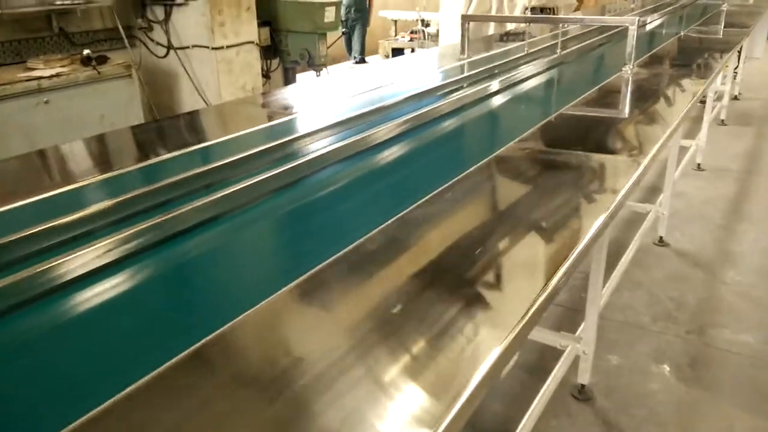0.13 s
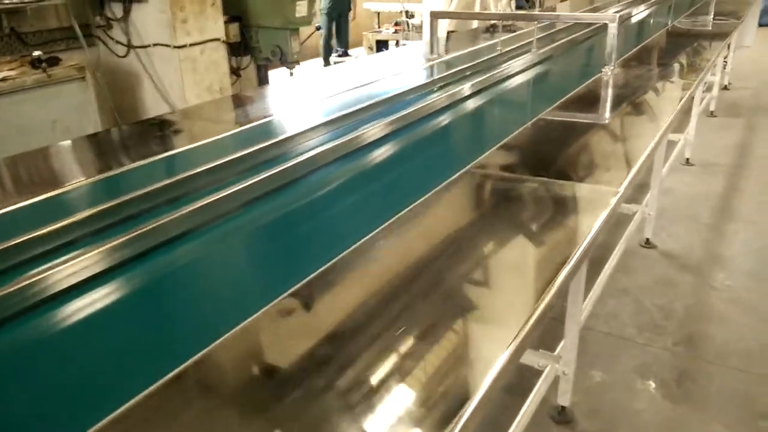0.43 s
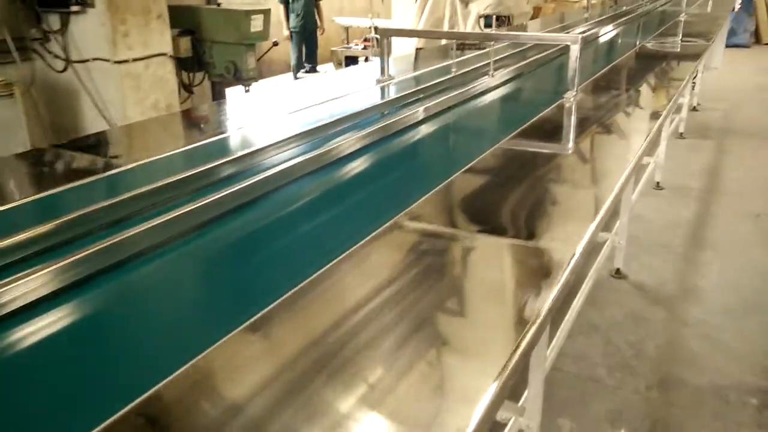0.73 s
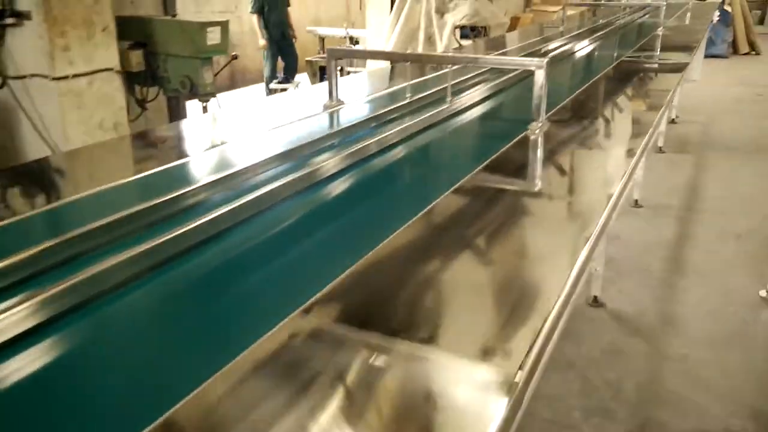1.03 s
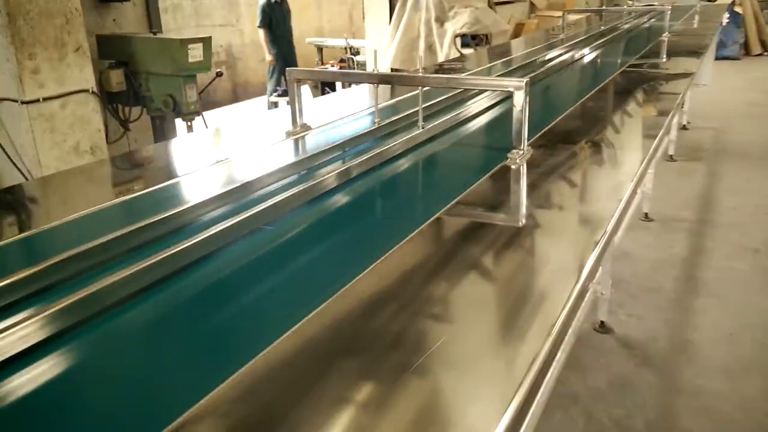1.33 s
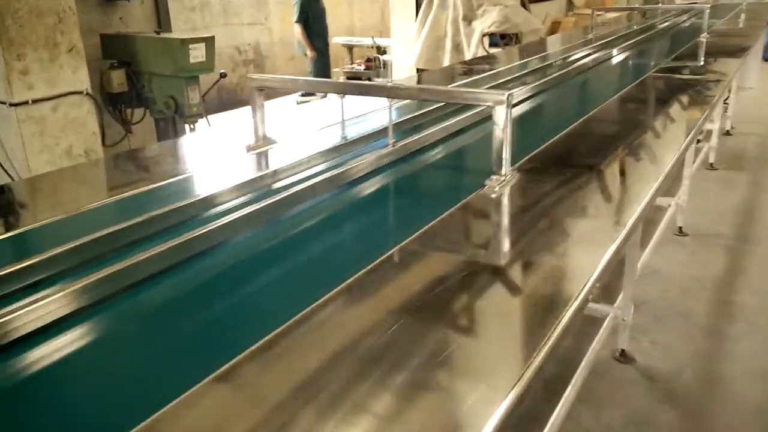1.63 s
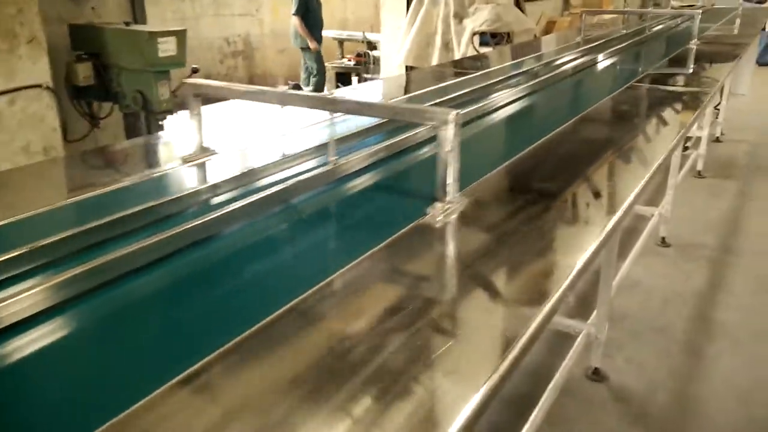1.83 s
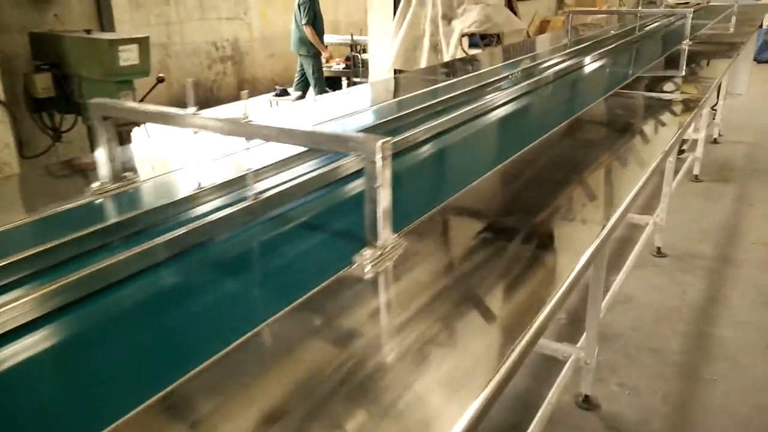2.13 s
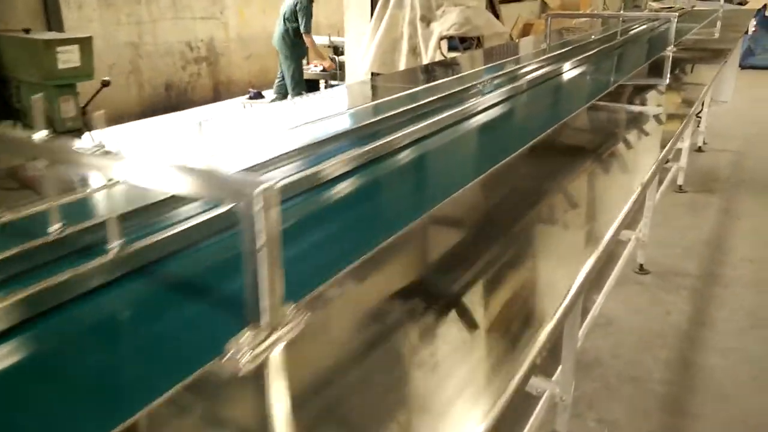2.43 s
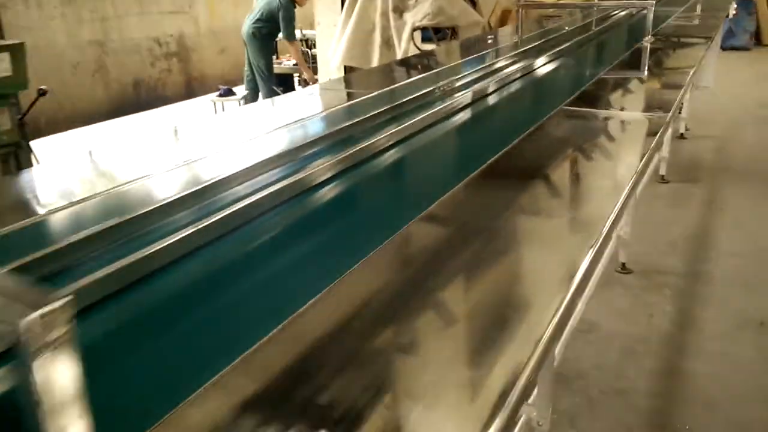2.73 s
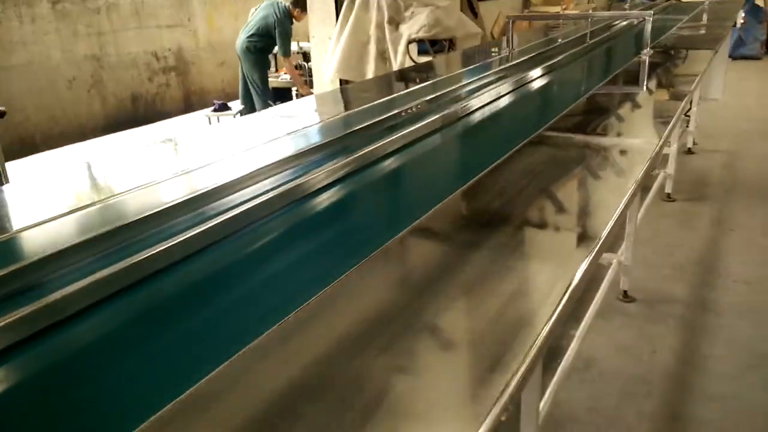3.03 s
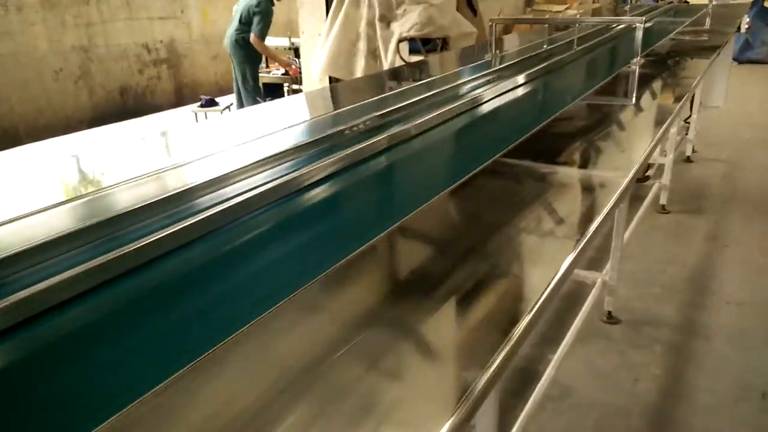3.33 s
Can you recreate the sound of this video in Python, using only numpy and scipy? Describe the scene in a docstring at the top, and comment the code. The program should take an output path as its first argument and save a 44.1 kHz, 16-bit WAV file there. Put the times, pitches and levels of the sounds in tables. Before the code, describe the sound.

Steady conveyor and motor roar, harsh metal-grinding squeals at start and end, wind thumping the microphone

```python
"""A steady roar of conveyor, motors and spinning grinder in a large hard workshop, with faint whines.
Twice, at the start and near the end, the grinder bites into metal: a bright rasp, ringing, squeals.
Short hisses swish by, then gusts buffet the microphone ports, the left one most.
Roar, rasp and wind are coloured noise; whines, rings and swishes are resonated noise;
squeals are jittering sines; buffets are short pressure wobbles."""
import sys
import numpy as np
from scipy import signal
from scipy.fft import rfft, irfft
from scipy.io import wavfile

SR = 44100
rng = np.random.default_rng(int(sys.argv[2]) if len(sys.argv) > 2 else 0)


def gain_from_decibels(decibels):
    """Convert decibel values to linear amplitude factors."""
    exponent = np.asarray(decibels, float) / 20
    return 10 ** exponent


def generate_wav(signal):
    """Clip the signal to [-1, 1] and save it as 16-bit WAV at the path in sys.argv[1]."""
    frames = np.transpose(np.atleast_2d(signal))
    scaled = np.clip(frames, -1, 1) * 32767
    pcm = np.round(scaled).astype(np.int16)
    wavfile.write(sys.argv[1], SR, pcm)


N = 154350
T = np.arange(N) / SR

# stereo balance: (frequency [Hz], left minus right [dB])
LEAN = [(60, 2), (300, -0.5), (1000, 0.5), (2000, -2.5), (5000, -3), (9000, -2.5), (14000, -1)]


def rms_one(x):
    """Scale to rms 1 over all channels."""
    return x / np.sqrt(np.mean(x ** 2) + 1e-20)


def in_time(rows, **ends):
    """Gain per sample from (time [s], level [dB]) rows, linear in dB."""
    return gain_from_decibels(np.interp(T, *np.transpose(rows), **ends))


def at_hz(points, hz):
    """Read a (frequency [Hz], value) table on a log-frequency axis."""
    table_hz, value = np.array(points).T
    return np.interp(np.log(hz), np.log(table_hz), value)


def spectrum_hz():
    """Frequencies of the spectrum bins, floored at 1 Hz for the log axis."""
    return np.maximum(np.fft.rfftfreq(N, 1 / SR), 1)


def drift(rate_hz):
    """Slow random curve of spread about 1: noise through two equal one-pole low-passes."""
    hop = 40  # samples per drawn point
    settle = 2000  # points dropped while the filter settles
    r = np.exp(-2 * np.pi * rate_hz * hop / SR)
    white = rng.standard_normal(N // hop + 2 + settle)
    slow = signal.lfilter([1], [1, -2 * r, r * r], white)[settle:]
    return np.interp(np.arange(N) / hop, np.arange(len(slow)), rms_one(slow))


def leaning(hz):
    """Left and right gain at a frequency, half the lean to each side."""
    return gain_from_decibels(at_hz(LEAN, hz) / 2 * np.array([[1], [-1]]))


def stereo_noise(spectrum):
    """Diffuse noise of a given colour: mid and side mixed for likeness by frequency; rms 1."""
    # (frequency [Hz], left-right correlation [-1..1])
    likeness = [(60, 0.8), (130, 0.98), (290, 0.91), (500, .7), (800, 0.57), (1150, -0.03), (1600, -0.34),
                (2200, -0.11), (5000, -0.0084), (15000, -0.039)]
    hz = spectrum_hz()
    mid, side = rfft(rng.standard_normal((2, N)))
    alike = np.clip(at_hz(likeness, hz), -1, 1)
    pair = np.sqrt(1 + alike) * mid + np.sqrt(1 - alike) * side * [[1], [-1]]
    return rms_one(irfft(pair * gain_from_decibels(at_hz(spectrum, hz)) * leaning(hz), N))


def resonate(x, hz, width_hz):
    """Two-pole resonance with about unit gain at its peak."""
    r = np.exp(-np.pi * max(width_hz, 5) / SR)
    poles = [1, -2 * r * np.cos(2 * np.pi * hz / SR), r * r]
    return signal.lfilter([(1 - r * r) / 2, 0, (r * r - 1) / 2], poles, x)


def resonate_twice(x, hz, width_hz):
    """Two equal resonances in series, for steeper skirts."""
    return resonate(resonate(x, hz, width_hz), hz, width_hz)


def ringing(modes, waver_db, rate_hz):
    """Noise excites every mode; each level drifts on its own by waver_db; sum scaled to rms 1."""
    white = rng.standard_normal((2, N))
    out = 0
    for hz, width, db in modes:
        level = gain_from_decibels(db + waver_db * drift(rate_hz))
        out = out + leaning(hz) * level * resonate_twice(white, hz, 1.2 * width)
    return rms_one(out)


def machines():
    """Conveyor, motors and idling grinder: coloured noise roar plus narrow resonances as whines."""
    # roar colour: (frequency [Hz], relative density [dB per Hz])
    roar_colour = [(22, -60), (36, -26), (46, -12), (65, 1), (100, -10.5), (130, -3.5), (200, -7.5),
                   (270, -4), (380, -7), (500, -6), (780, -5), (1150, -7), (1700, -4), (2500, -5),
                   (4300, -4.5), (5200, -4.5), (6200, -5), (7300, -6), (8200, -13), (9200, -20),
                   (12000, -29), (15500, -35)]
    # roar swell, only its shape counts: (time [s], relative level [dB])
    roar_level = [(0.0, -33.5), (0.01, -33.5), (0.81, -31.5), (1.94, -33), (2.8, -32), (3.5, -33.5)]
    # whines: (frequency [Hz], width of each resonance / 1.2 [Hz], relative level [dB])
    whines = [(4550, 40, -6), (5230, 40, -6), (5390, 50, -5), (5570, 45, -3), (5890, 40, -4),
              (6100, 40, -6), (6262, 50, 0), (6425, 50, -4), (6765, 60, -1.5), (7135, 50, -5)]
    # all whines together: (time [s], level [dB])
    whine_level = [(0, -35), (1.5, -30), (2.2, -28), (2.8, -29.5), (3.5, -39)]
    roar_db = -22.5
    swell = in_time(roar_level)
    roar = gain_from_decibels(roar_db + 0.3 * drift(9.0)) * swell / swell.mean() * stereo_noise(roar_colour)
    return roar + in_time(whine_level) * ringing(whines, waver_db=2.0, rate_hz=6.9)


def grinder():
    """Disc on metal: rasp and work-piece modes follow the pressure, roughened by chatter."""
    # disc pressure in each cut: (time [s], relative level [dB])
    first_cut = [(0, -32.5), (.15, -31.5), (.45, -30.5), (.55, -35), (.64, -36.5), (.7, -42), (.8, -71),
                 (.95, -70)]
    second_cut = [(2.84, -55), (2.872, -60), (2.878, -38.5), (2.982, -31), (3.28, -26), (3.296, -29),
                  (3.352, -26.5), (3.486, -29.5), (3.5, -35)]
    # rasp colour: (frequency [Hz], relative density [dB per Hz])
    rasp_colour = [(1200, -31), (2000, -11), (4000, -9), (6500, -4), (8300, -3), (8900, -15.5),
                   (9600, -12.5), (10400, -8.5), (11500, -19.5), (12200, -24), (13200, -19), (14000, -22),
                   (16000, -44)]
    # modes at the two spots: (frequency [Hz], width of each resonance / 1.2 [Hz], relative level [dB])
    first_modes = [(6470, 60, -1), (6710, 73, 6), (7500, 60, -13), (7630, 340, 10), (8000, 120, -6),
                   (8580, 520, 3), (8750, 120, -10), (9840, 79, -19), (9900, 230, -1), (10730, 200, 2),
                   (13100, 410, -4.5)]
    second_modes = [(1870, 190, -10), (2330, 190, -13), (3600, 150, -12), (4540, 80, -11), (5450, 140, -5),
                    (6880, 180, -5), (7600, 130, 0), (9230, 100, -15), (10200, 250, -10), (10900, 150, -17),
                    (11800, 60, -21), (13200, 340, -23)]
    rasp_db, ring_db = 9, 5  # over the pressure curve
    chatter = gain_from_decibels(0.44 * drift(7.2) + 1.0 * drift(90.0))
    first = in_time(first_cut, right=-120)
    second = in_time(second_cut, left=-120)
    rasp = (first + second) * stereo_noise(rasp_colour)
    first_rings = first * ringing(first_modes, waver_db=0.5, rate_hz=6.1)
    second_rings = second * ringing(second_modes, waver_db=0.0, rate_hz=2.9)
    return chatter * (gain_from_decibels(rasp_db) * rasp + gain_from_decibels(ring_db) * (first_rings + second_rings))


def envelope(start_s, length_s):
    """Power of a half sine: steep flanks, flat top."""
    return np.sin(np.pi * np.clip((T - start_s) / length_s, 0, 1)) ** 0.2


def squeals():
    """One mode takes over: a sine with jittering pitch, its phase and level drifting apart per ear."""
    # (start [s], length [s], frequency [Hz], twice the pitch jitter spread [Hz], level before flutter [dB])
    squeal_rows = [(-.1, .3, 4925, 10, -34), (.03, .33, 7545, 35, -31), (.08, .14, 10165, 25, -35),
                   (.14, .36, 8490, 30, -33), (.22, .13, 2118, 15, -33), (.38, .14, 2110, 25, -34),
                   (.4, .28, 8685, 12, -37), (.42, .12, 2255, 25, -35), (2.86, .07, 7500, 50, -33),
                   (2.95, .65, 7595, 60, -29), (3.03, .2, 5430, 70, -32), (3.08, .22, 1800, 60, -34),
                   (3.1, .15, 10180, 60, -36), (3.2, .25, 6900, 60, -32), (3.25, .35, 1875, 70, -31),
                   (3.35, .2, 2330, 30, -37)]
    out = 0
    for start, length, hz, width, db in squeal_rows:
        pitch_turns = np.cumsum(hz + width / 2 * drift(40.0)) / SR
        ear_turns = 0.06 * np.array([drift(8.0), drift(8.0)]) + [[0], [0.25]]
        tone = np.sqrt(2) * np.sin(2 * np.pi * (pitch_turns + ear_turns))
        flutter = gain_from_decibels(2.5 * np.array([drift(25.0), drift(25.0)]))
        out = out + leaning(hz) * gain_from_decibels(db) * envelope(start, length) * flutter * tone
    return out


def swishes():
    """Mid-high hiss: broadly resonated noise that sets in quickly and fades as a Gaussian."""
    # (start [s], fade to 1/e [s], centre [Hz], width of each resonance [Hz], level before shaping [dB])
    swish_rows = [(.4, .14, 3600, 2500, -33), (.7, .1, 4150, 1500, -29), (.7, .22, 5800, 2500, -30),
                  (.79, .1, 3300, 2000, -35), (1.24, .18, 3600, 2500, -36)]
    attack_s = 0.012
    white = rng.standard_normal((2, N))
    out = 0
    for start, length, hz, width, db in swish_rows:
        attack = np.clip((T - start) / attack_s, 0, 1)
        shape = attack * np.exp(-((T - start) / length) ** 2)
        hiss = rms_one(resonate_twice(white, hz, width))
        out = out + leaning(hz) * gain_from_decibels(db) * shape * hiss
    return out


def buffets(rows):
    """Each buffet is a short low wobble of pressure with a quick snap at its middle."""
    wobble_cycles, snap_cycles, snap_db = 0.55, 0.12, -3
    out = np.zeros(N)
    phases_rad = rng.uniform(-0.64, 1.0, len(rows))
    for (middle_s, db, hz), phase in zip(rows, phases_rad):
        cycles = (T - middle_s) * hz
        wobble = np.exp(-(cycles / wobble_cycles) ** 2) * np.cos(2 * np.pi * cycles + phase)
        snap = 2 * cycles / snap_cycles * np.exp(-(cycles / snap_cycles) ** 2)
        out += gain_from_decibels(db) * (wobble + gain_from_decibels(snap_db) * snap)
    return out


def wind():
    """Turbulence at the ports: lumpy low noise, independent at each port, plus single buffets."""
    # gusts on the left port: (time [s], level before lumps [dB])
    gust = [(1.6, -48), (1.97, -47), (2.1, -28.5), (2.22, -46), (2.4, -25.5), (2.49, -31), (2.52, -25),
            (2.68, -22), (2.72, -27), (2.8, -33), (2.84, -41), (3.0, -29), (3.2, -25), (3.28, -36),
            (3.37, -30), (3.5, -25)]
    # wind colour: (frequency [Hz], relative density [dB per Hz])
    wind_colour = [(20, -36), (40, -11), (70, -8.5), (130, -10), (250, -20.5), (500, -34), (900, -53)]
    # buffets on each port: (middle [s], wobble level [dB], frequency [Hz])
    left_buffets = [(2.515, -15, 140), (2.535, -14, 131), (2.55, -14.5, 79.6), (2.6, -10, 118),
                    (2.63, -13, 153), (2.645, -14.5, 88), (2.68, -11.5, 86), (2.775, -18, 110),
                    (2.87, -14, 110), (2.955, -23, 110), (3.0, -15, 90), (3.022, -19, 170),
                    (3.036, -12, 220), (3.05, -5.5, 113), (3.06, -26, 79.5), (3.093, -9, 133),
                    (3.168, -14.5, 170), (3.217, -16.5, 90)]
    right_buffets = [(2.627, -21, 140), (2.662, -20, 85), (2.685, -18, 151), (3.152, -19, 120),
                     (3.172, -33, 80), (3.186, -19, 120)]
    lump_db, right_port_db = 2, -9
    white = rfft(rng.standard_normal((2, N)))
    noise = rms_one(irfft(white * gain_from_decibels(at_hz(wind_colour, spectrum_hz())), N))
    lumps = gain_from_decibels(lump_db * np.array([drift(5.3), drift(14.0)]) + [[0], [right_port_db]])
    gusts = noise * lumps * in_time(gust, left=-70)
    return gusts + np.array([buffets(left_buffets), buffets(right_buffets)])


def scene():
    """Sum of all sources at the microphone."""
    return machines() + grinder() + squeals() + swishes() + wind()


def low_pass(x):
    """Removes everything above the highest recorded frequency."""
    return signal.sosfilt(signal.butter(12, 15650, fs=SR, output="sos"), x)


def record(dry):
    """The microphone loses the deepest bass: third-order high-pass."""
    low_cut_hz = 42
    low_cut = signal.butter(3, low_cut_hz, "high", fs=SR, output="sos")
    heard = signal.sosfilt(low_cut, dry)
    return low_pass(heard)


dry = scene()
out = record(dry)
generate_wav(out)
```